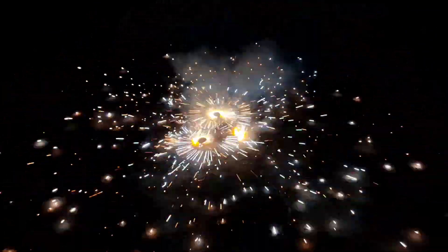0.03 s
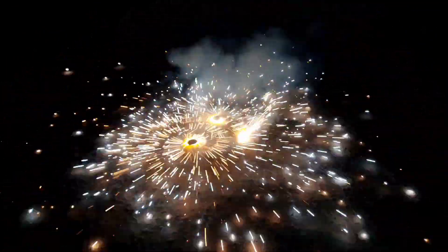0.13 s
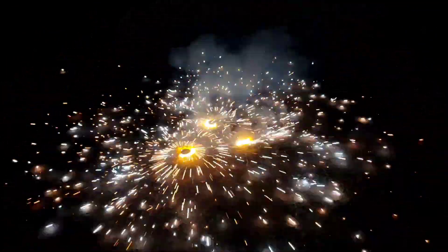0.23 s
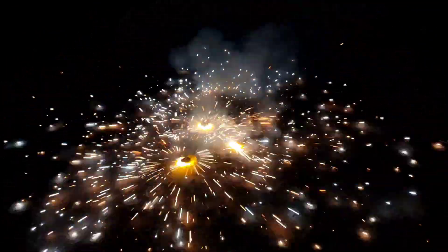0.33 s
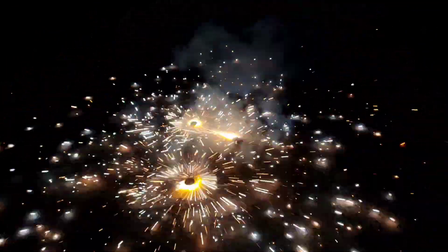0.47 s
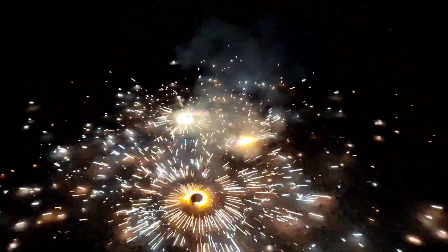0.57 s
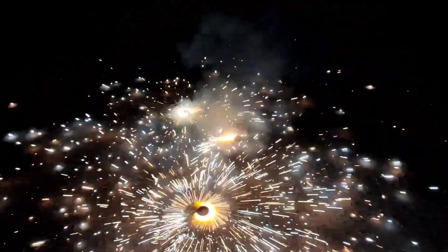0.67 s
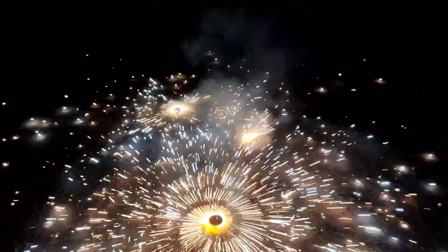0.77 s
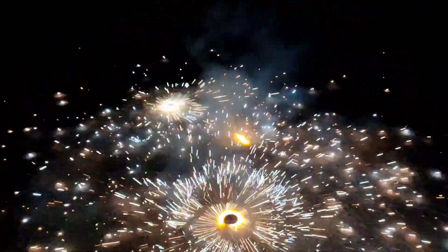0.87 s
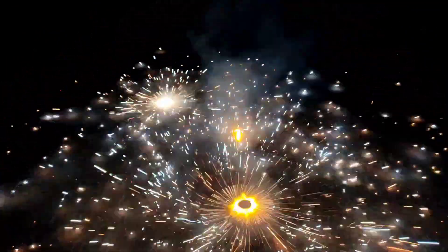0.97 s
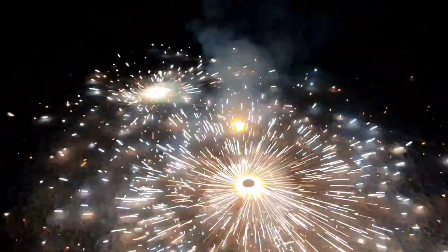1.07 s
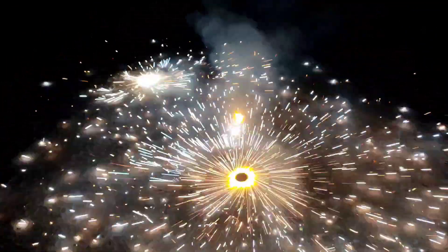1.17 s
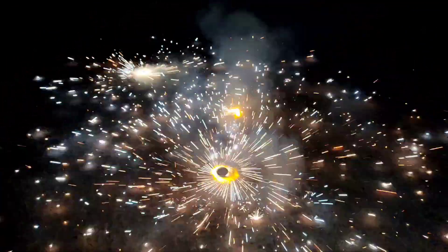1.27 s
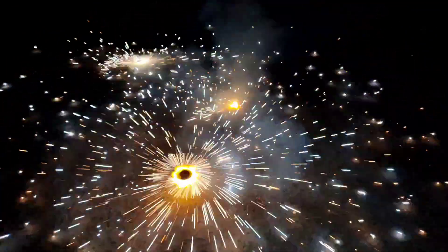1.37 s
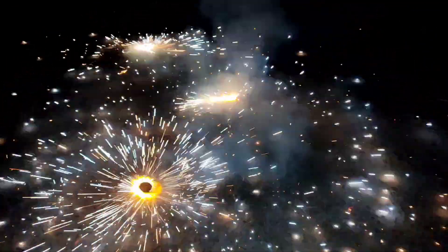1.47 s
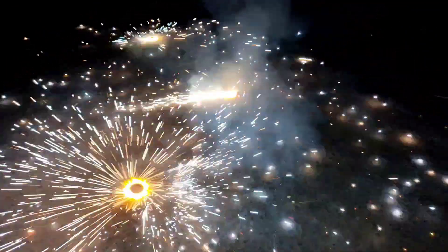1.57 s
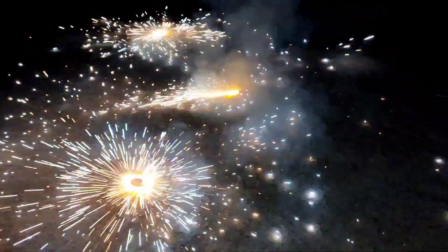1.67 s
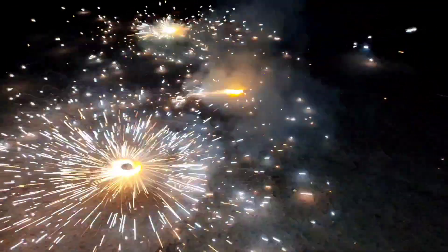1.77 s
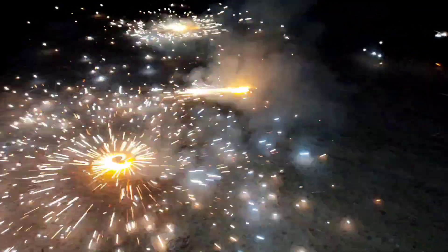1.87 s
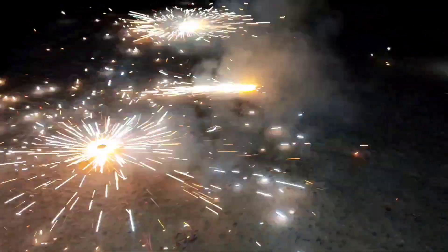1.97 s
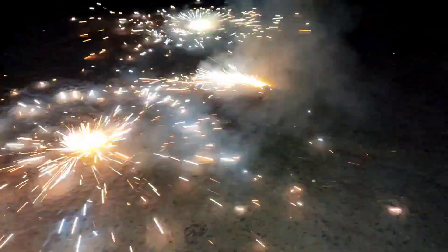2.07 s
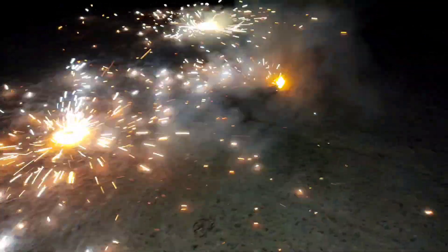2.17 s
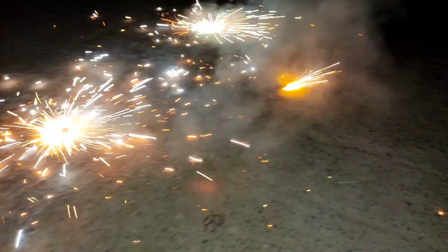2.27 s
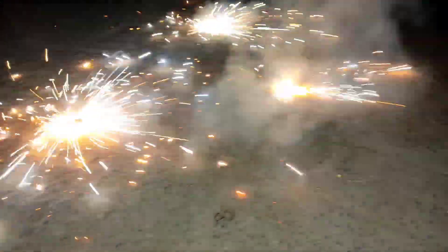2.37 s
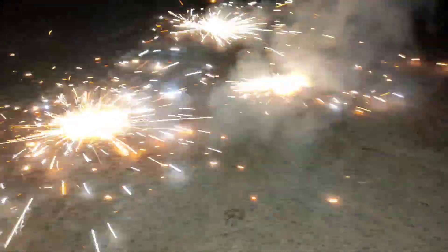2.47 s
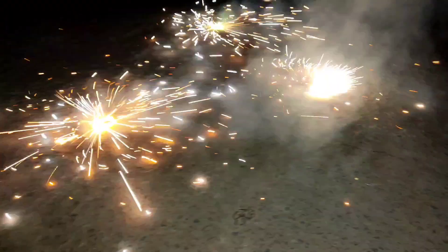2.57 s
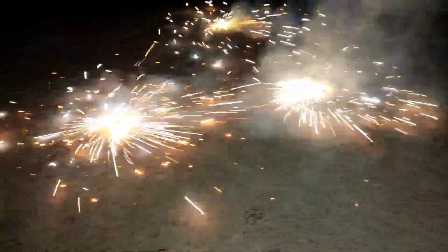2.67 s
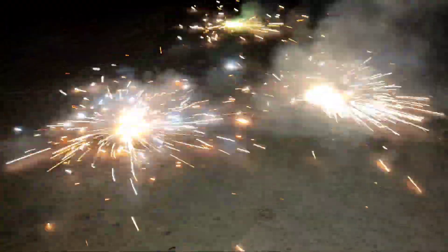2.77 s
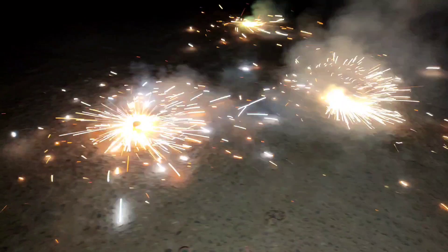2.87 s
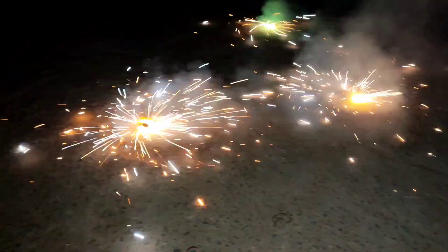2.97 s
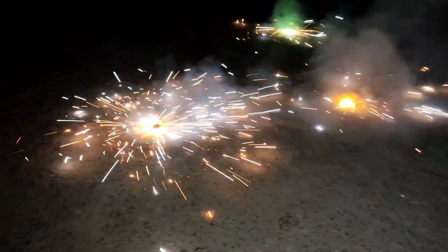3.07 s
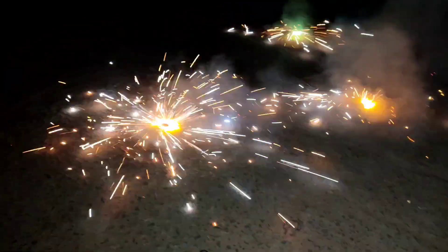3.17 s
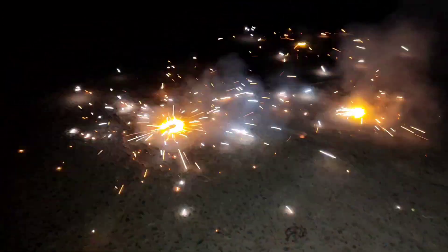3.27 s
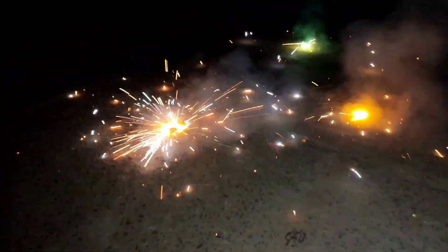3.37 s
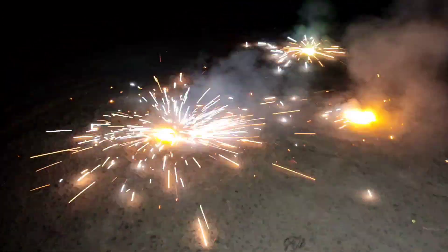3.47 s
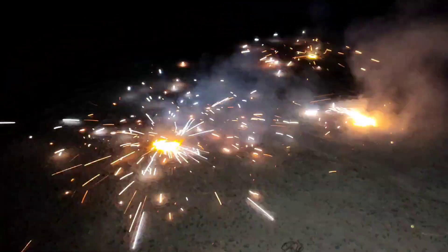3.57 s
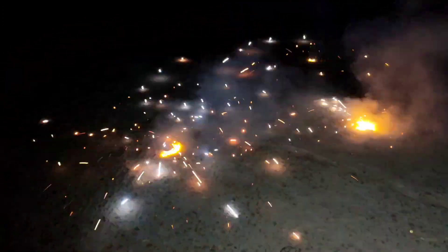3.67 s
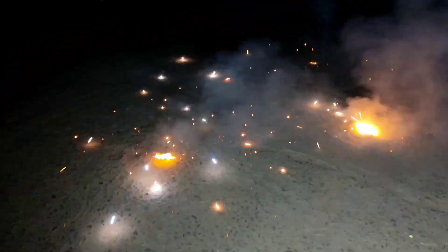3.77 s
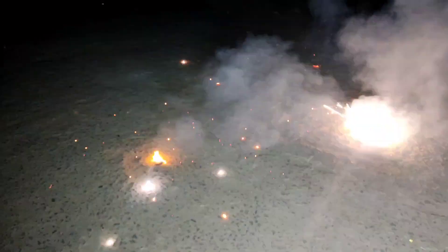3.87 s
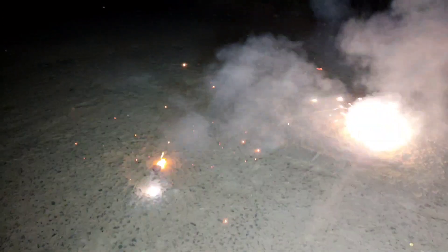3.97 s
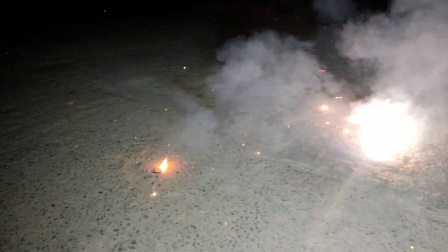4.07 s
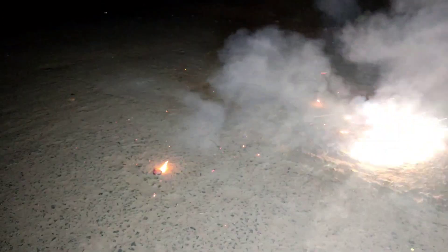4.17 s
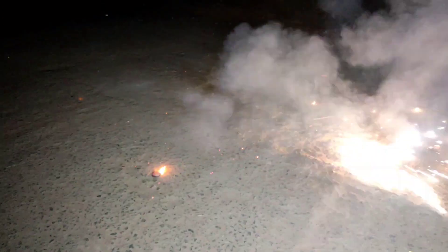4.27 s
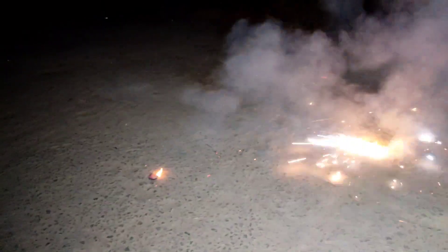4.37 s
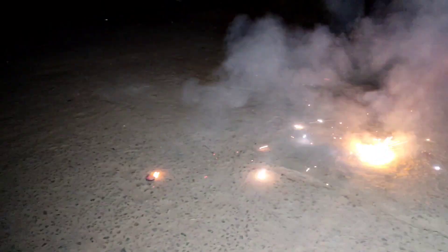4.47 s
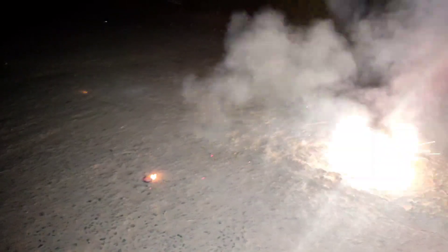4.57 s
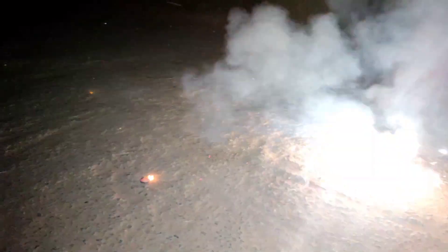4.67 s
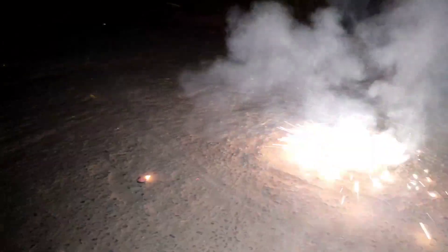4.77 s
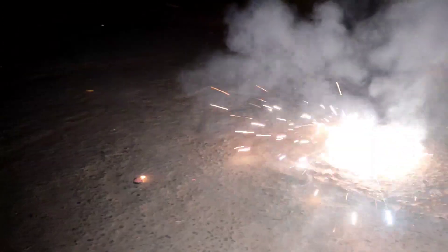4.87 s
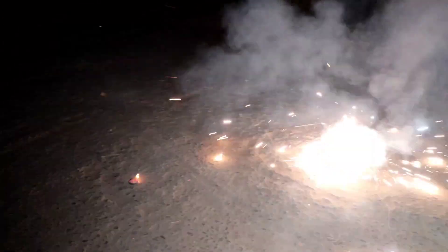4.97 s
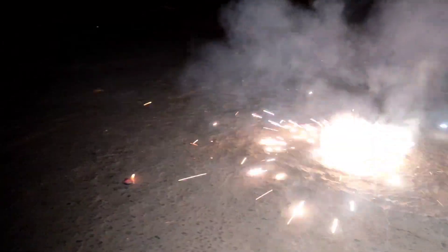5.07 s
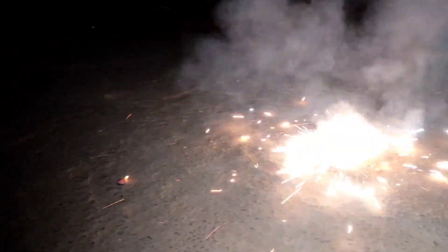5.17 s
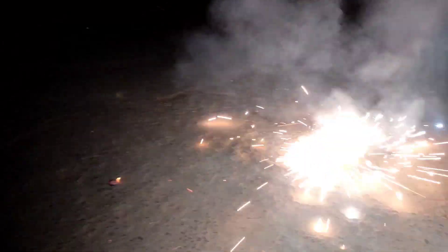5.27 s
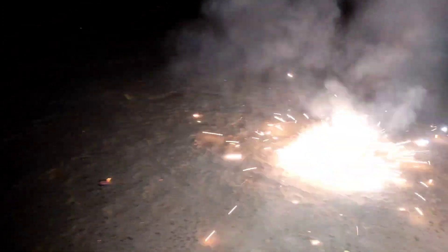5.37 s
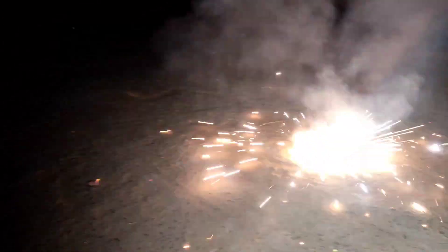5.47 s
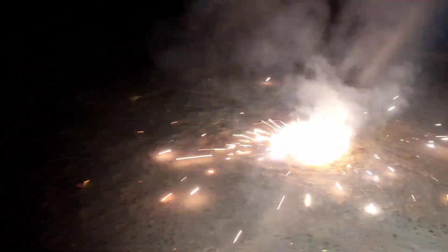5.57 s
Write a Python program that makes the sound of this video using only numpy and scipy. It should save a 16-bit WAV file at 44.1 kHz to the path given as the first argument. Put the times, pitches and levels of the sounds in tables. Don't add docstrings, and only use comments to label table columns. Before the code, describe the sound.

A harsh, crackling jet-like hiss of spinning fireworks on hard ground fades to a lone flare, choking and pushing back in puffs.

```python
import sys
import numpy as np
from scipy import signal
from scipy.fft import rfft, irfft, next_fast_len
from scipy.io import wavfile
from scipy.ndimage import uniform_filter1d, map_coordinates

SR = 44100
rng = np.random.default_rng(int(sys.argv[2]) if len(sys.argv) > 2 else 0)


def int16_out(signal):
    q = np.round(np.clip(np.atleast_2d(signal).T, -1, 1) * 32767)
    wavfile.write(sys.argv[1], SR, q.astype(np.int16))


N = 247384

# start_s, thrust_db, nearness_db, spark_load_db
WHEELS = [(0, -26.5, 0.5, 7), (.3, -26.5, -0.5, 4.5), (.4, -29.5, 0, 4.5), (.7, -22.5, -2, 4.5),
          (.82, -22, -2, 5), (.94, -20, 2.5, 7), (1.1, -25, 1, 5), (1.47, -25, 3, 3), (1.54, -32, 7, 4),
          (1.85, -28.5, 3.5, 0), (2.05, -26, 2, -0.5), (2.6, -28, 0, -0.5), (3.0, -27.5, -1, 0.5),
          (3.4, -27, 0, 1), (3.53, -35, 2.5, 2), (3.7, -28, 2, 0), (3.83, -34, 1.5, -1),
          (3.9, -42, 1.5, 4.5)]
# start_s, thrust_db, nearness_db, spark_load_db
FLARE = [(3.99, -52, 0.5, 3), (4.04, -44.5, -1.5, -0.5), (4.12, -34.5, -3.5, -0.5), (4.23, -39, -1, 1),
         (4.48, -32, -3, 0.5), (4.59, -35.5, -2.5, -7.5), (4.72, -48, 1, 5.5), (4.78, -39, -2, -2.5),
         (4.9, -35.5, -4.5, -0.5), (4.98, -35, -1, -2), (5.12, -31.5, -5, -1), (5.61, -32, -2, -1.5)]
LAYER_HZ = [
    80,
    400,
    2000,
    7000,
    13000,
]
FOLLOWS = [
    (.55, 1.8, 0.056, .02),
    (.6, 1.1, .01, 0.02),
    (1.01, .01, .01, 0.26),
    (1.01, .01, 1.15, 0.95),
    (1.1, 0.53, 0.92, 0.73),
]
# pitch_hz, flicker_db
GRIT = [
    (100, 3),
    (1000, 0),
    (3000, 0.8),
    (7000, 1),
    (14000, -2),
]
# pitch_hz, direct_share (0-1)
LIKENESS = [
    (30, 1),
    (80, 1),
    (300, 1),
    (700, 1),
    (1500, 0.94),
    (3000, 0.58),
    (4500, 0.5),
    (7000, 0.22),
    (14000, 0.26),
]
# pitch_hz, level_db (per Hz)
JET_COLOUR = [(24, -44), (40, -23.5), (81, -14.5), (121, -14.5), (200, -3.5), (363, -7.5), (615, -0.5),
              (810, -4.5), (2300, -4), (3300, -9), (5500, -11.5), (8900, -12.5), (10000, -14), (15500, -26)]


def jets(spread, patchy_db, spark_share):
    thrust, nearness, spark_load = in_time(WHEELS + FLARE)
    layer_db = np.array(FOLLOWS) @ np.array([thrust, nearness, spark_load, surges()])
    layer_db = layer_db - layer_db.mean(axis=1, keepdims=True)

    white = rng.standard_normal((2, 4, N))
    popping = white + spark_share * sparks(per_s=2500., spread_db=6.5)
    burst = spits(swell_ms=0.92, dying_ms=12.0)
    flutter = drift(53.0) + 0.1 * drift(240.0)

    out = np.zeros((4, N))
    edges_hz = 28 * 2 ** np.arange(0, 9.6, .5)
    for k, (low, high) in enumerate(zip(edges_hz, edges_hz[1:])):
        hz = np.sqrt(low * high)

        place = np.interp(np.log(hz), np.log(LAYER_HZ), range(5))
        under = min(int(place), 3)
        level_db = layer_db[under] + (place - under) * (layer_db[under + 1] - layer_db[under])

        source = popping if hz > 1200 else white
        band_filter = signal.butter(2, [low, high], "band", fs=SR, output="sos")
        band = signal.sosfilt(band_filter, source[k % 2])
        flicker_db = patchy_db * drift(17.5) + at_hz(GRIT, hz) * flutter
        brightness = np.clip(place - 1.5, 0, 1.5) / 1.5
        gain = from_db(level_db + flicker_db) * burst ** brightness

        direct = np.clip(at_hz(LIKENESS, hz), 0, 1) ** spread
        out += gain * band * np.sqrt([direct, direct, 1 - direct, 1 - direct])
    return coloured(out, lambda hz: at_hz(JET_COLOUR, hz))


# crest_s, gain_db, swell_s
WHEEL_SURGES = [(.02, 3, 0.05), (0.109, 6, 0.042), (.22, 1.5, 0.089), (.48, 2.5, .06), (.66, 2, 0.025),
                (0.832, 6, 0.057), (1.08, -1, 0.023), (1.22, 6.5, 0.026), (1.35, 4.5, 0.21),
                (1.46, 3, 0.026), (1.588, 10.5, 0.097), (1.74, 9, 0.075), (1.92, 3.5, 0.038),
                (2.22, 6.5, 0.26), (2.578, 12, .12), (2.63, 9.5, .03), (2.71, 6.5, 0.15),
                (2.831, 13, 0.052), (2.87, 10.5, .03), (2.95, 9, 0.081), (2.99, 7.5, 0.033),
                (3.11, 5.5, 0.028), (3.251, 7.5, 0.067), (3.34, 7.5, 0.074), (3.4, 4, 0.058),
                (3.7, -0.5, .08), (3.82, 7, 0.021)]
# crest_s, gain_db, swell_s
FLARE_SURGES = [
    (4.11, 4.8, 0.061),
    (4.33, 7.2, 0.077),
    (4.45, 9.6, 0.14),
    (4.779, 10.6, 0.074),
    (5.14, 4.7, 0.072),
    (5.34, 7.6, 0.06),
    (5.5, 8.3, 0.05),
    (5.59, 7, .04),
]


def surges():
    crest_s, gain_db, swell_s = np.transpose(WHEEL_SURGES + FLARE_SURGES)[:, :, None]
    at = np.arange(0, N, 32)
    age = at / SR - crest_s
    drop_s = .015 + .15 * swell_s
    span = np.where(age < 0, 0.53 * swell_s, drop_s)
    bumps_db = gain_db * np.exp(-.5 * (age / np.maximum(span, 1e-3)) ** 2)
    return np.interp(np.arange(N), at, bumps_db.max(axis=0))


# start_s, added_gain_db (against the hiss)
SPITS = [(.087, -6.5), (.198, -7), (.477, -25.5), (.641, -27), (.813, -17), (1.08, 2.5), (1.196, -7),
         (1.708, -9), (1.736, -26), (1.898, -18), (2.176, 4), (2.208, 10), (2.235, 4), (2.487, -4),
         (2.581, -4), (2.664, -3), (2.703, -2), (2.748, -1), (2.829, -3), (2.899, -5), (2.943, 1),
         (2.977, 2.5), (3.227, -14), (3.267, 1.5), (3.35, -4), (3.81, -21), (4.071, -5), (4.75, -20),
         (5.326, -18), (5.583, -8)]


def spits(swell_ms, dying_ms):
    gain, t = np.ones(N), np.arange(N) / SR
    for start_s, peak_db in SPITS:
        i = slice(max(round((start_s - .01) * SR), 0), round((start_s + .1) * SR))
        age_ms = (t[i] - start_s) * 1000
        dying = np.exp(-np.maximum(age_ms, 0) / dying_ms)
        gain[i] += from_db(peak_db) * dying / (1 + np.exp(-age_ms / swell_ms))
    return gain / uniform_filter1d(gain, size=SR // 8)


def sparks(per_s, spread_db):
    size_db = spread_db * np.minimum(rng.exponential(1, (4, N)), 5)
    sizes = from_db(size_db) * rng.choice([-1, 1], (4, N))
    return rms_one(sizes * (rng.random((4, N)) < per_s / SR))


# start_s, wheels_left_late_samples, flare_share (0-1), spread (how spread out the fire is)
PLACE = [(0, 0.65, 0.1, 1.45), (.6, 2.6, 0.2, 1.6), (1.15, 1.1, 0.05, 0.83), (1.48, 1.3, 0, 0.88),
         (1.6, 3.3, 0.65, 2.6), (1.85, 4.9, 0.18, 1.3), (2.4, 10.8, 0.35, 3.7), (2.65, 12.4, 0.53, 0.98),
         (2.87, 8.2, 0.06, 1.46), (3.2, 6.7, 0.1, 1.37), (3.45, 5.6, 0.04, 1.9), (3.95, 4.7, .3, 1.9),
         (4.02, 3.3, 0.9, 0.97), (4.9, 5.4, 1, 2.2), (5.61, 5.4, 0.95, 0.89)]
# start_s, left_late_samples
FLARE_LAG = [
    (0, -6),
    (4.05, -9),
    (4.87, -8),
    (4.95, -6.2),
    (5.1, -8),
    (5.61, -5),
]


def fire_at_ports():
    lag, share, spread = in_time(PLACE)
    wheels, flare, *scattered = jets(np.maximum(spread, .1), patchy_db=1.36, spark_share=0.41)
    share = np.clip(share, 0, 1)
    from_wheels = np.sqrt(1 - share) * late(wheels, lag)
    from_flare = np.sqrt(share) * late(flare, *in_time(FLARE_LAG))
    return from_wheels + from_flare + scattered


def late(x, samples):
    n = np.arange(N)
    return np.array([map_coordinates(x, [n - side * samples / 2], order=3, mode="nearest") for side in (1, -1)])


# start_s, left_minus_right_db
SHADING = [
    (0.0, -1.5),
    (1.31, -8),
    (1.34, -10.5),
    (1.42, -3),
    (1.94, -8.5),
    (2.05, -9.5),
    (3.75, -6),
    (4.36, -2),
    (5.59, -3.5),
    (5.61, -10),
]


def shaded(fire):
    treble = signal.sosfiltfilt(signal.butter(2, 3500., "high", fs=SR, output="sos"), fire)
    pan_db = in_time(SHADING)[0] + 3.1 * drift(4.1)
    pan_db = pan_db - pan_db.mean()
    return fire + treble * (from_db(.5 * pan_db * [[1], [-1]]) - 1)


# pitch_hz, width_hz, gain_db
LEFT_PORT = [
    (1116, 76, 4.5),
    (4150, 460, -3.5),
    (8540, 670, 11.0),
    (394, 360, 2),
]
# pitch_hz, width_hz, gain_db
RIGHT_PORT = [
    (7460, 500, 8.5),
    (6800, 1650, 8),
]


def through_ports(fire):
    return np.array([coloured(fire[0], bells(LEFT_PORT)), coloured(fire[1], bells(RIGHT_PORT))])


def bells(port):
    return lambda hz: sum(db * np.exp(-.5 * ((hz - centre) / width) ** 2) for centre, width, db in port)


# pitch_hz, level_db (per Hz)
NIGHT = [
    (24, -40),
    (40, -15),
    (214, -38),
    (386, 36),
    (711, 9),
    (3800, 11),
    (9000, -3),
    (11700, -65),
    (19800, -120),
]


def night():
    noise = rng.standard_normal(N) + 3.3 * rng.standard_normal((2, N))
    return from_db(-85) * rms_one(coloured(noise, lambda hz: at_hz(NIGHT, hz)))


def from_db(db):
    return 10 ** (np.asarray(db) / 20)


def rms_one(x):
    return x / np.sqrt(np.mean(x ** 2) + 1e-20)


def in_time(rows):
    s, *columns = np.transpose(rows)
    return [np.interp(np.arange(N) / SR, s, c) for c in columns]


def at_hz(points, hz):
    return np.interp(np.log(hz), np.log(np.array(points)[:, 0]), np.array(points)[:, 1])


def drift(rate):
    r = np.exp(-40 * np.pi * rate / SR)
    noise = rng.standard_normal(N // 20 + 3002)
    slow = signal.lfilter([1], [1, -2 * r, r * r], noise)[3000:]
    return np.interp(np.arange(N) / 20, np.arange(len(slow)), rms_one(slow))


def coloured(x, gain_db):
    size = next_fast_len(N + 4096)
    hz = np.maximum(np.arange(size // 2 + 1) * SR / size, 1)
    return irfft(rfft(x, size) * from_db(gain_db(hz)), size)[..., :N]


# start_s, lower_edge_hz, width_hz
CANCEL = [(.35, 9900, 0), (.55, 9900, 2400), (.95, 9900, 0), (1.68, 3100, 0), (1.85, 3100, 350),
          (2.0, 3100, 0), (2.78, 2920, 0), (2.93, 2920, 600), (3.02, 2920, 100), (3.08, 2900, 950),
          (3.36, 2950, 650), (3.42, 3100, 200), (3.92, 3150, 300), (4.03, 2870, 200), (4.87, 2870, 200),
          (4.95, 3480, 250), (5.08, 3080, 450), (5.61, 3080, 650)]


def cancelling(hz, s):
    hold_s, ragged = .07, .5
    step = (s / hold_s).astype(int)
    at, low_hz, width_hz = np.transpose(CANCEL)
    low = np.interp(s, at, low_hz)
    jumps = rng.uniform(-1, 1, step.max() + 1)[step]
    width = np.interp((step + .5) * hold_s, at, width_hz) * (1 + ragged * jumps)
    return (hz[:, None] > low) & (hz[:, None] < low + width)


# pitch_hz, threshold_db (against the neighbourhood)
THRIFT = [(60, -45), (400, -24), (1000, -14), (2000, -7.5), (2850, -6), (3100, -2.5), (4500, -1),
          (6300, -1.5), (7300, -7), (8500, -1.5), (9700, 2), (15000, 2)]


def thinned(x, wander_db, given_up_db):
    mid_side = np.array([x[0] + x[1], x[0] - x[1]]) / 2
    hz, s, cells = signal.stft(mid_side, SR, nperseg=2048, noverlap=1536)
    power = np.abs(cells) ** 2
    own = uniform_filter1d(uniform_filter1d(power, size=3, axis=1), size=4, axis=2)
    joint = uniform_filter1d(uniform_filter1d(power.mean(axis=0), size=24, axis=0), size=5, axis=1)

    budget = uniform_filter1d(rng.standard_normal((2, len(hz) // 8 + 1, len(s))), size=6, axis=2)
    budget = np.repeat(rms_one(budget), 8, axis=1)[:, :len(hz)]
    bar_db = at_hz(THRIFT, np.maximum(hz, 1))[:, None] + wander_db * budget

    patches = uniform_filter1d(rng.standard_normal((2, len(hz) // 64 + 1, len(s))), size=24, axis=2)
    starved = np.repeat(np.maximum(rms_one(patches) - .3, 0), 64, axis=1)[:, :len(hz)]
    bar_db += 3 * starved * (hz > 9700)[:, None]

    thrust_db = np.interp(s, *np.transpose(WHEELS + FLARE)[:2])
    quiet_db = np.clip(-34 - thrust_db, 0, 5)
    bar_db += .7 * np.outer(hz > 12300, quiet_db)

    bar_db[0] += given_up_db * cancelling(hz, s)
    keep = (own > joint * from_db(2 * bar_db)) & (hz < 15540)[:, None]
    mid, side = signal.istft(cells * keep, SR, nperseg=2048, noverlap=1536)[1][:, :N]
    return np.array([mid + side, mid - side])


def scene():
    fire = through_ports(shaded(fire_at_ports()))
    return from_db(-24.5 + 3.5) * rms_one(fire) + night()


def top_cut(x):
    return signal.sosfilt(signal.butter(12, 16270, fs=SR, output="sos"), x)


def record(dry):
    rounded = 1.1 * np.tanh(dry / 1.1)
    mix = thinned(rounded, wander_db=2.6, given_up_db=9.0)
    return top_cut(mix)


dry = scene()
out = record(dry)
int16_out(out)
```